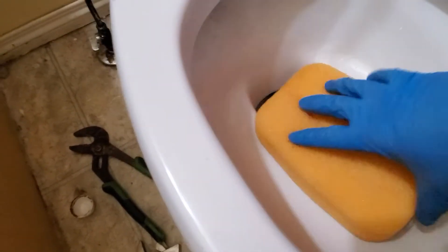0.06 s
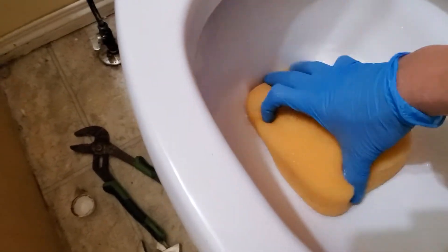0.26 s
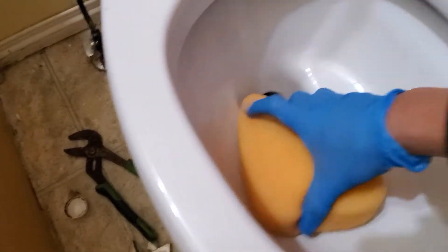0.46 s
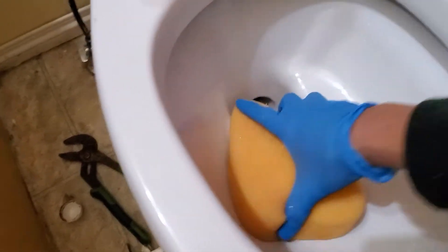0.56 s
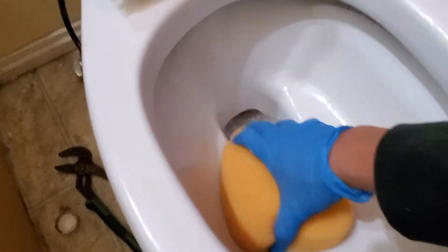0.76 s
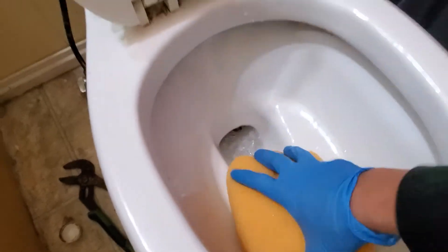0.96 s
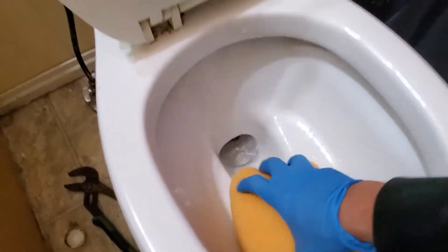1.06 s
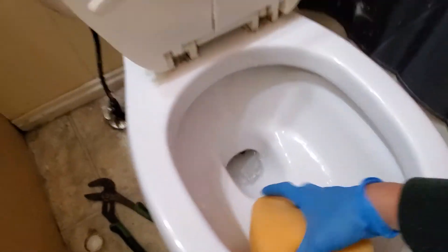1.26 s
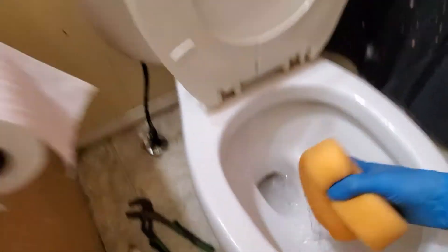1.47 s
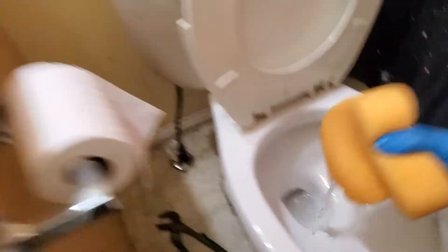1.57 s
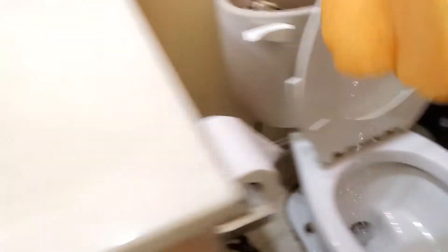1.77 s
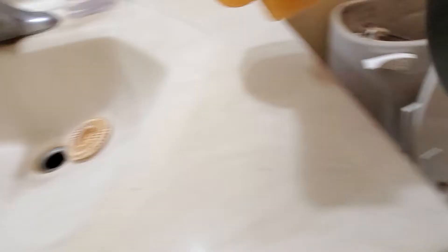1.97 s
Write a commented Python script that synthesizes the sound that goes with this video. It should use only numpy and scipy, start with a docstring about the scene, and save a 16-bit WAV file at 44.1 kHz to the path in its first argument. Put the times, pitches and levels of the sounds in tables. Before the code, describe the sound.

Close up in a small bathroom, a soaked sponge squishes and slaps twice in a toilet bowl as water gulps in the drain. It settles into soft fizzing and ends with light drips, over dull handling rumble.

```python
"""A big sponge, pressed by a gloved hand into the last water of a toilet bowl, expels trapped air in
two loud wet slaps. Its foam fizzes as countless cells pop, while water sloshes and gulps in the drain.
Bubbles ring as damped oscillators, and drips spatter as the sponge is lifted out. The splashes excite
the modes of the bowl and the reverberation of a small room, over a dull rumble of handling."""
import sys
import numpy as np
from scipy import signal
from scipy.fft import rfft, irfft
from scipy.io import wavfile
from scipy.ndimage import uniform_filter1d

SR = 44100
rng = np.random.default_rng(int(sys.argv[2]) if len(sys.argv) > 2 else 0)


def wrap_up_sound(samples):
    """Save the sound to the file named by the first command line argument, as 16-bit audio."""
    columns = np.atleast_2d(samples).T
    # keep every value between -1 and 1, then stretch to whole-number steps
    tamed = np.clip(columns, -1, 1)
    steps = np.round(tamed * 32767).astype(np.int16)
    wavfile.write(sys.argv[1], SR, steps)


N = 88200
T = np.arange(N) / SR
HZ = np.fft.rfftfreq(N, 1 / SR)

# Handling noise. Each row: time in seconds, relative level in dB.
RUMBLE_LEVELS = [(0.0, -50.5), (0.08, -46.5), (0.19, -59), (0.27, -42.5), (0.49, -53), (0.87, -50),
                 (0.92, -66), (1.04, -51.5), (1.15, -66.5), (1.4, -70), (1.44, -57.5), (1.93, -68),
                 (2.0, -70)]
# Hand thuds and air gusts. Each row: start in seconds, level in dB, rise and decay in seconds.
HAND_THUDS = [(0.042, -42.5, 0.028, 0.055), (0.24, -37.5, 0.041, 0.047), (.764, -45, 0.014, 0.052)]
AIR_GUSTS = [(1.4, -53, 0.041, 0.037), (1.8, -57, .04, 0.16), (1.79, -62, 0.057, 0.077),
             (.99, -59, 0.027, 0.064)]
# Moving water. Each row: time in seconds, relative levels of churning and of lapping in dB.
WATER_LEVELS = [(0, -52, -58), (0.12, -56.5, -67.5), (0.22, -64, -54), (0.28, -39.5, -51.5),
                (0.345, -36.5, -46.5), (0.405, -32, -39.5), (0.46, -39, -51.5), (0.52, -46, -46.5),
                (0.56, -50.5, -55.5), (0.62, -38, -40.5), (0.655, -39.5, -51.5), (0.71, -58.5, -53.5),
                (0.8, -45, -51.5), (0.88, -55.5, -52.5), (0.98, -60, -63.5), (1.05, -63, -59.5),
                (1.14, -57, -65), (1.3, -56.5, -68), (1.41, -61, -73), (1.55, -53, -63.5),
                (1.75, -64, -66.5), (1.86, -63, -75.8), (2, -77, -107)]
# Squeezed foam. Each row: time in seconds, relative levels of fizz and of squish in dB.
FOAM_LEVELS = [(0, -45.5, -47), (0.11, -49.5, -54.8), (0.2, -43, -47.5), (0.255, -49.5, -54.5),
               (0.31, -40.5, -44.5), (0.35, -35.5, -42.5), (0.42, -46, -45.5), (0.46, -45.5, -47.2),
               (0.53, -46.5, -49), (0.585, -52.5, -56), (0.64, -43, -46), (0.685, -50.5, -55.5),
               (0.72, -53, -54.5), (0.8, -49, -53.5), (0.86, -48, -50.5), (0.98, -48.5, -54),
               (1.1, -52, -56), (1.21, -59, -58), (1.31, -54, -58), (1.42, -61.5, -63), (1.55, -52.5, -57),
               (1.7, -55, -61), (1.82, -52.5, -64.5), (1.92, -58.9, -61), (2, -54.5, -74.5)]
# Spits of spray. Each row: start in seconds, level in dB, decay in seconds.
SPRAY_SPITS = [(0.383, -48, .004), (.507, -36.5, 0.0054), (.676, -42.5, 0.0039), (.764, -35, 0.0031),
               (0.854, -45, .002), (1.2989, -50.5, 0.0047), (1.794, -47, 0.0072), (1.8503, -35, 0.0031),
               (1.855, -44, 0.027), (1.8688, -38.5, .0015), (1.89, -41.5, 0.0013)]
# Ringing air pockets. Each row: start in seconds, pitch in Hz, peak level in dB,
# rise and decay in seconds, glide in octaves per second.
BUBBLE_RINGS = [(0.168, 319, -32.5, .007, 0.0041, -10.5), (.209, 278, -39, 0.0033, 0.0074, -11),
                (0.2419, 272, -24.5, 0.0039, 0.0043, 0), (0.257, 236, -35, 0.0047, 0.023, -12),
                (.368, 308.4, -21.5, 0.0051, 0.0081, -8.5), (.3695, 770, -14.5, 0.0016, 0.0029, 5),
                (.374, 433, -27.5, 0.0027, 0.013, -29.5), (.398, 3070, -27, 0.0037, .003, 0),
                (0.404, 2985, -20, 0.0017, .004, -8), (.413, 727, -28.5, 0.0078, 0.0037, 16),
                (.485, 5610, -38.5, 0.0016, 0.0049, -17), (.512, 403, -40, .01, .012, -4),
                (.594, 400, -36.5, 0.008, .005, 11), (0.608, 556, -34, 0.0154, 0.0056, -1),
                (.635, 348, -38, 0.0064, 0.0077, 0), (0.631, 2530, -41, 0.00082, 0.0063, 33),
                (0.6745, 2520, -37, 0.002, .003, 5), (0.7624, 1086, -18.5, 0.0015, 0.0017, -4),
                (0.7643, 353, -19.5, 0.0049, 0.0057, -18), (0.785, 2980, -33, 0.0012, 0.002, -5),
                (.8548, 6100, -43.5, 0.0009, 0.0057, 1.5), (.954, 778, -44.5, .004, 0.007, -1.5),
                (1.019, 291, -43.5, 0.0044, 0.009, 3), (1.068, 320, -36, .012, 0.0044, -8),
                (1.070, 730, -48, 0.0051, 0.014, 1.5), (1.161, 318, -49, .004, 0.0045, 8),
                (1.256, 4710, -43, 0.0022, 0.0037, 1), (1.313, 6040, -49, 0.0015, .003, 0),
                (1.547, 4670, -50.5, 0.0051, 0.0063, 19.5), (1.7502, 4990, -45, .002, 0.0063, 10.5),
                (1.876, 3192, -49, 0.0046, 0.02, -1), (1.868, 1303, -52.5, .002, 0.019, 5),
                (1.88, 1323, -40.5, 0.0064, 0.009, -1)]
# Bursts of air. Each row: start in seconds, level in dB, rise and decay in seconds, tilt in dB per octave.
AIR_BURSTS = [(.3662, -20, .0008, 0.0023, -0.5), (0.3696, -6.5, 0.00058, 0.0024, 0),
              (.379, -28, 0.0045, 0.021, 7.5), (.404, -29.5, 0.0016, 0.0077, 3.5),
              (0.7629, -20, 0.00025, 0.0027, -2.1), (.784, -30.5, 0.001, 0.0029, -2),
              (.572, -47, .0015, .002, 1), (.953, -45, 0.0023, 0.0051, 1),
              (1.061, -40.5, 0.021, 0.014, -6.5), (1.162, -48, 0.0015, 0.005, 0.5),
              (1.256, -49, .0008, .003, 3)]

# Spectra of the noises. Each row: frequency in Hz, relative spectral density in dB.
GUST_SPECTRUM = [(12, -17), (30, 5), (50, -6.5), (90, -7), (300, -47)]
RUMBLE_SPECTRUM = [(15, -29.5), (32, -23), (52, -11), (72, 5.5), (90, -2.5), (130, -7), (200, -35.5),
                   (600, -43)]
CHURN_SPECTRUM = [(90, -32), (190, -7), (230, -6), (300, 8.5), (380, 0.5), (480, -9.5), (800, -32),
                  (2000, -42.5)]
LAP_SPECTRUM = [(250, -12.5), (450, -5), (580, 3), (800, -2), (1150, -5), (1500, -26), (3000, -40.5),
                (8000, -60)]
FIZZ_SPECTRUM = [(3000, -25), (6800, -7.5), (7500, -13), (8600, -10), (10000, -6.5), (12500, -3),
                 (14500, -1), (15600, 2)]
SQUISH_SPECTRUM = [(1500, -4), (2600, -9), (3600, 2), (4400, 0.5), (5700, -3.5), (6600, -3), (7050, -6),
                   (7400, -14), (12000, -23)]
SQUELCH_SPECTRUM = [(500, -21.5), (1000, -7.5), (1500, -2), (1900, -1), (2600, -4.5), (3200, -6),
                    (4200, -21.5), (9000, -46.5)]
JET_SPECTRUM = [(1500, -31.5), (3200, -1.5), (3900, 3.5), (4500, -1), (5400, -11), (6600, -7), (7500, -36)]
SPRAY_SPECTRUM = [(800, -43), (2200, -20), (3200, -6.5), (5000, -14.5), (6400, -5.5), (7600, -15.5),
                  (10000, -3.5), (12000, -4), (15500, -8.5)]
SLAP_SPECTRUM = [(25, -54.5), (80, -29.5), (200, -16), (290, 0.5), (420, -0.5), (540, -4.5), (800, 4),
                 (1150, -6), (1750, -10), (2700, -1), (4500, -6.5), (5800, -15), (6650, -11.5),
                 (7500, -26.5), (9500, -22), (15500, -19.5)]

# Modes of the bowl and its hollow. Each row: frequency in Hz, gain in dB, 60 dB decay time in seconds.
BOWL_MODES = [(229, 1, .42), (281, 3, .36), (382, 4, .55), (441, 5, .5), (735, -9, .3), (844, -9, .26),
              (2110, 8, .11), (2370, -2, .12), (2810, -3, .09)]
# Small hard room. Each row: frequency in Hz, 60 dB decay time in seconds.
ROOM_DECAY = [(100, 0.21), (400, 0.26), (1000, 0.21), (3000, 0.17), (12000, 0.17)]
# Response of the right microphone. Each row: frequency in Hz, gain relative to the left in dB.
RIGHT_RESPONSE = [(60, 0.5), (200, 2.2), (380, -2.5), (700, 0.5), (1290, -9), (2380, -14.5), (4200, -23.5),
                  (6000, -31.5), (8100, -30.5), (15000, -32)]
# Likeness of left and right. Each row: frequency in Hz, correlation from 0 to 1.
COHERENCE = [(60, .95), (300, 0.78), (640, 0.48), (1400, 0.12), (3000, 0.206), (12000, .05)]


def amp(db):
    """Amplitude ratio for a level in decibels."""
    return 10 ** (np.asarray(db) / 20)


def unit_rms(x):
    """Normalisation to unit mean power."""
    return x / np.sqrt(np.mean(x ** 2) + 1e-20)


def at_hz(table, hz):
    """Interpolation on a logarithmic frequency axis."""
    frequencies, values = np.transpose(table)
    return np.interp(np.log(hz + 1), np.log(frequencies), values)


def envelope(table, column=1):
    """Gain over time, interpolated in decibels."""
    rows = np.array(table)
    return amp(np.interp(T, rows[:, 0], rows[:, column]))


def add(mix, start, sound):
    """Superposition of a sound from a start time in seconds."""
    part = mix[max(round(start * SR), 0):][:len(sound)]
    part += sound[:len(part)]


def swell(t, rise, decay):
    """Smooth onset followed by exponential damping."""
    return np.sin(np.pi / 2 * np.minimum(t / rise, 1)) ** 2 * np.exp(-np.maximum(t - rise, 0) / decay)


def colour(x, spectrum, tilt_db=0, size=4096):
    """A minimum-phase filter of unit energy imposes a spectrum, tilted above 300 Hz."""
    hz = abs(np.fft.fftfreq(size, 1 / SR))
    log_gain = np.log(amp(at_hz(spectrum, hz) + tilt_db * np.log2(np.maximum(hz, 300) / 300)))
    response = np.exp(np.conj(signal.hilbert(log_gain)))
    taps = np.fft.ifft(response).real[:size // 2]
    return signal.fftconvolve(x, taps / np.linalg.norm(taps))[:len(x)]


def stereo_pair(left, independent):
    """Partial coherence: two unrelated noises become a left and right that agree in the bass."""
    shared = np.clip(at_hz(COHERENCE, HZ), 0, 1)
    right = irfft(shared * rfft(left) + np.sqrt(1 - shared ** 2) * rfft(independent), N)
    return np.array([left, right])


def shot_noise(spectrum, per_s, spread_db, wash=1.0):
    """Randomly timed impulses merge into a grainy texture over a wash of smooth noise."""
    def side():
        sizes = amp(spread_db * np.minimum(rng.exponential(1, N), 4)) * rng.choice([-1, 1], N)
        clicks = unit_rms(sizes * (rng.random(N) < per_s / SR))
        return unit_rms(colour(clicks + wash * rng.standard_normal(N), spectrum))
    return stereo_pair(side(), side())


def room(x, delay_s=0.006):
    """Reverberation: dense reflections from close walls decay exponentially, the treble first."""
    hz, t, noise = signal.stft(rng.standard_normal((2, N)), SR, nperseg=256)
    t60 = at_hz(ROOM_DECAY, hz)[:, None]
    _, tails = signal.istft(noise * amp(-60 * t / t60), SR, nperseg=256)
    tails = tails[:, :N] * (T > delay_s)
    response = stereo_pair(*tails) / np.linalg.norm(tails[0])
    return signal.fftconvolve(x[None], response, axes=1)[:, :N]


def bowl(x):
    """Modal resonance: the bowl answers each impulse with a sum of damped sinusoids."""
    t = T[:SR // 2]
    response = np.zeros(len(t))
    for hz, db, t60 in BOWL_MODES:
        unity_at_resonance = 2 * np.log(1000) / (t60 * SR)
        response += unity_at_resonance * amp(db - 60 * t / t60) * np.sin(2 * np.pi * hz * t)
    return signal.fftconvolve(x, response)[:N]


def rumble(thud_hz=72.2):
    """Low-frequency forcing: the hand thuds and rumbles, and air buffets the moving microphones."""
    thuds, gusts, t = np.zeros(N), np.zeros(N), T[:SR // 2]
    for start, db, rise, decay in HAND_THUDS:
        add(thuds, start, amp(db) * swell(t, rise, decay) * np.sin(2 * np.pi * thud_hz * t))
    for start, db, rise, decay in AIR_GUSTS:
        add(gusts, start, amp(db) * swell(t, rise, decay))
    air = np.array([amp(side_db) * unit_rms(colour(rng.standard_normal(N), GUST_SPECTRUM))
                    for side_db in (-2, 3)])
    handling = shot_noise(RUMBLE_SPECTRUM, per_s=330, spread_db=3, wash=0.73)
    return thuds + gusts * air + amp(-3.5) * envelope(RUMBLE_LEVELS) * handling


def water():
    """Forced resonance: churning in the drain drives the bowl's hollow, as water laps the porcelain."""
    churn = shot_noise(CHURN_SPECTRUM, per_s=580, spread_db=2.5, wash=0.5)
    churn *= amp(-2.5) * envelope(WATER_LEVELS)
    hollow = amp(1.5) * np.array([bowl(side) for side in churn])
    lapping = shot_noise(LAP_SPECTRUM, per_s=600, spread_db=0, wash=0.77)
    return churn + hollow + amp(0.5) * envelope(WATER_LEVELS, column=2) * lapping


def foam(lift_s=1.44, lift_takes_s=0.28, lift_db=-2.5):
    """Shot noise of cells popping in the sponge: a fizz, a squish and a lower squelch."""
    fizz = amp(3.5) * shot_noise(FIZZ_SPECTRUM, per_s=3000, spread_db=2)
    squish = amp(-1.5) * shot_noise(SQUISH_SPECTRUM, per_s=1500, spread_db=3)
    lifted = np.clip((T - lift_s) / lift_takes_s, 0, 1)
    squelch = amp(-2 + lift_db * lifted) * shot_noise(SQUELCH_SPECTRUM, per_s=950, spread_db=2.5)
    return envelope(FOAM_LEVELS) * fizz + envelope(FOAM_LEVELS, column=2) * (squish + squelch)


def pore_jets(start_s=0.2255):
    """Flow noise: rising pressure drives air and water through the pores before the first slap."""
    flow = np.zeros(N)
    add(flow, start_s, amp(-37) * swell(T, rise=0.13, decay=0.06))
    return flow * shot_noise(JET_SPECTRUM, per_s=4300, spread_db=6.5, wash=0.71)


def spray(rise_s=0.0013, roughness_db=3):
    """Film rupture: thin sheets of water break up in bright, grainy bursts of noise."""
    spits, t = np.zeros(N), T[:SR // 6]
    for start, db, decay in SPRAY_SPITS:
        noise, flicker = rng.standard_normal((2, len(t)))
        rough = unit_rms(noise * amp(roughness_db * flicker))
        add(spits, start, amp(db) * rough * swell(t, rise_s, decay))
    return colour(spits, SPRAY_SPECTRUM)


def bubbles(wobble_octaves=0.022, wobble_s=0.0012):
    """Damped oscillation: each air pocket rings briefly, its pitch shifting as it changes shape."""
    rings, t = np.zeros(N), T[:SR // 10]
    for start, hz, db, rise, decay, glide in BUBBLE_RINGS:
        wobble = unit_rms(uniform_filter1d(rng.standard_normal(len(t)), round(wobble_s * SR)))
        pitch = hz * 2 ** (glide * t + wobble_octaves * wobble)
        phase = 2 * np.pi * np.cumsum(pitch) / SR
        add(rings, start, amp(db) * swell(t, rise, decay) * np.sin(phase))
    return rings


def slaps():
    """Sudden pressure release: air bursts from under the sponge in short, broadband wet cracks."""
    cracks, t = np.zeros(N), T[:SR // 6]
    for start, db, rise, decay, tilt in AIR_BURSTS:
        burst = rng.choice([-1., 1.], len(t)) * swell(t, rise, decay)
        add(cracks, start, amp(db) * colour(burst, SLAP_SPECTRUM, tilt))
    return cracks


def scene(bowl_db=-1, room_db=-7.5):
    """Superposition: splashes ring in the bowl and the room, over foam, hiss, water and rumble."""
    splashes = slaps() + bubbles() + spray()
    ringing = splashes + amp(bowl_db) * bowl(splashes)
    return ringing + amp(room_db) * room(ringing) + foam() + pore_jets() + water() + rumble()


def record(dry, right_lag_s=0.00011, cutoff_hz=15800):
    """Path difference delays the farther, muffled right microphone; both sides are band-limited."""
    right_response = amp(at_hz(RIGHT_RESPONSE, HZ)) * np.exp(-2j * np.pi * HZ * right_lag_s)
    heard = np.array([dry[0], irfft(rfft(dry[1]) * right_response, N)])
    lowpass = signal.firwin(511, cutoff_hz, window=("kaiser", 9), fs=SR)
    return signal.oaconvolve(heard, lowpass[None], "same", axes=1)


dry = scene()
out = record(dry)
wrap_up_sound(out)
```